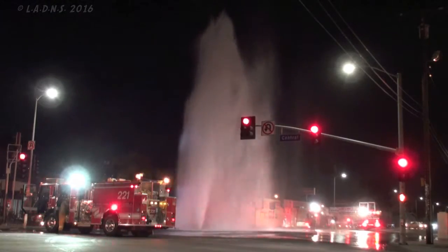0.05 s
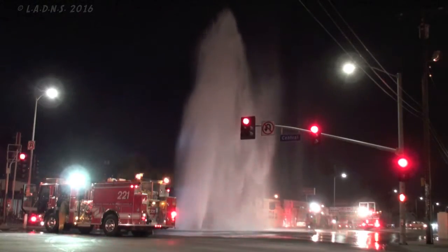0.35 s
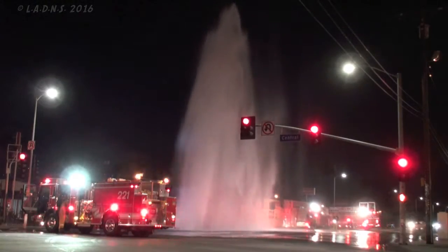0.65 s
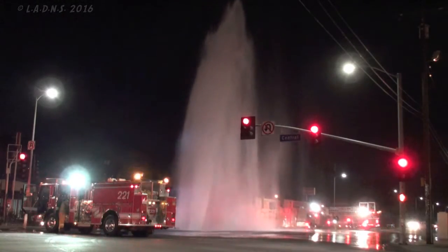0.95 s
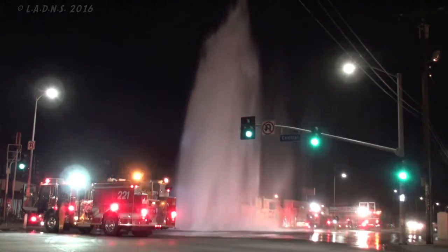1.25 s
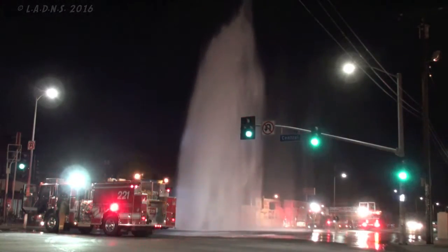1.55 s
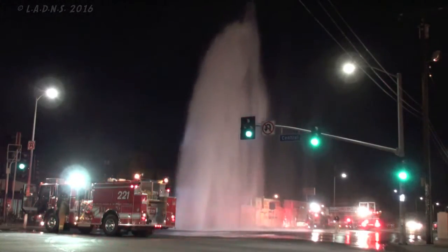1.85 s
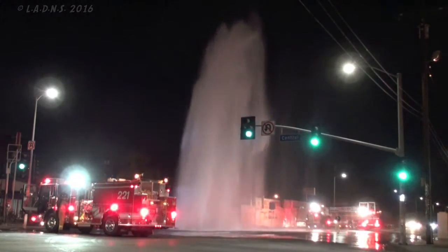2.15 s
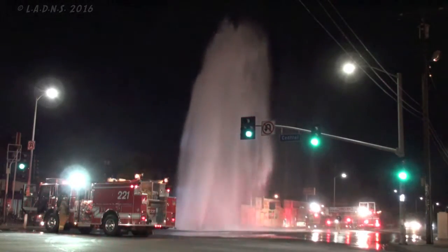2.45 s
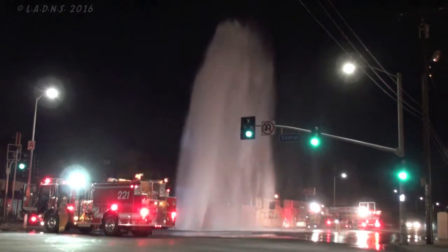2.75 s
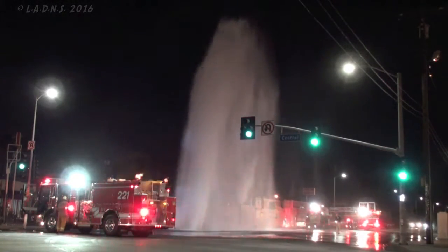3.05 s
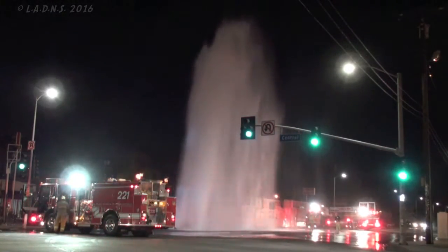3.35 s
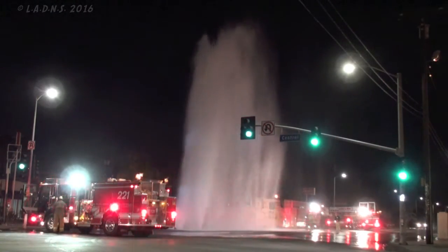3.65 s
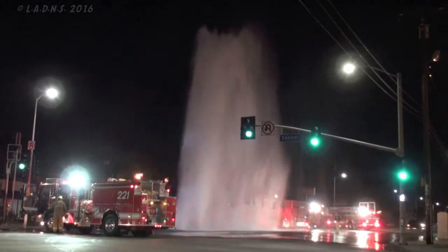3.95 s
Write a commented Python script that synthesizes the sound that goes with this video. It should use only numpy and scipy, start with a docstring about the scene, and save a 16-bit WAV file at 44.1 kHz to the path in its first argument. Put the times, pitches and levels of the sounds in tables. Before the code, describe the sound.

Water from a broken hydrant roars steadily and splatters on the street, with slapping clumps and ticking drops. Idling trucks rumble behind it, and halfway through an engine on the left pulls away, rising in pitch, heard in stereo.

```python
"""A broken hydrant throws a tall column of water that roars and splatters down on a night street.
At the stereo microphones its fall is a flickering roar, with sheets landing, clumps slapping the road
and drops ticking on the asphalt. Standing trucks rumble behind it. Halfway through, an eight-cylinder
engine on the left pulls away, its exhaust rising in pitch, and the recorder's gain control eases
everything down a little."""
import sys
import numpy as np
from scipy import signal
from scipy.fft import rfft, irfft
from scipy.io import wavfile

SR = 44100
rng = np.random.default_rng(int(sys.argv[2]) if len(sys.argv) > 2 else 0)


def wav_out(sig):
    """Save sig, one row per channel (or a flat mono array), as 16-bit PCM at SR to the path in sys.argv[1]."""
    wavfile.write(sys.argv[1], SR, np.round(np.clip(np.atleast_2d(sig).T, -1, 1) * 32767).astype(np.int16))


N = 176400
T = np.arange(N) / SR
HZ = np.maximum(np.fft.rfftfreq(N, 1 / SR), 1)


def from_db(db):
    """Decibels to gain."""
    return 10 ** (np.asarray(db) / 20)


def rms_one(x):
    """Scale to unit power."""
    return x / np.sqrt(np.mean(x ** 2) + 1e-20)


def in_time(rows):
    """Read a control curve at every sample."""
    return np.interp(T, *np.transpose(rows))


def at_hz(points, hz):
    """Read a spectrum on a log-frequency axis."""
    f, value = np.transpose(points)
    return np.interp(np.log(hz), np.log(f), value)


def pan(db):
    """Gains that make the left channel louder than the right by db."""
    return from_db(np.array([[.5], [-.5]]) * db)


def drift(rate_hz):
    """Smooth random motion of spread 1."""
    step, settle = 40, 2000
    r = np.exp(-2 * np.pi * rate_hz * step / SR)
    noise = rng.standard_normal(N // step + settle + 2)
    slow = signal.lfilter([1], [1, -2 * r, r * r], noise)[settle:]
    return np.interp(np.arange(N) / step, np.arange(len(slow)), rms_one(slow))


def bandpass(x, low_hz, high_hz):
    """Butterworth band-pass."""
    return signal.sosfilt(signal.butter(2, [low_hz, high_hz], "band", fs=SR, output="sos"), x + 1e-18)


def resonate(x, hz, width_hz):
    """One resonance with gain 1 at its peak."""
    r = np.exp(-np.pi * width_hz / SR)
    feedback = [1, -2 * r * np.cos(2 * np.pi * hz / SR), r * r]
    return signal.lfilter(np.array([1, 0, -1]) * (1 - r * r) / 2, feedback, x + 1e-18)


def resonate_twice(x, hz, width_hz):
    """Two equal resonances in series, for steeper sides."""
    return resonate(resonate(x, hz, width_hz), hz, width_hz)


def clicks(per_s, spread_db):
    """Random impacts, mostly small with a few large."""
    sizes = np.minimum(rng.exponential(1, N), 4)
    return (rng.random(N) < per_s / SR) * from_db(spread_db * sizes)


# How alike the left and right channels are; the highest treble is almost mono.
# Each row: frequency in Hz, likeness from 0 to 1.
STEREO_LIKENESS = [(40, 0), (110, .55), (250, .86), (430, .75), (750, .87), (1500, .58), (2200, .84),
                   (2650, .76), (3300, .91), (6500, .95), (9000, .92), (10500, .97), (11800, .996),
                   (14000, .999)]
# Which side is louder. Each row: frequency in Hz, left minus right in dB.
STEREO_BALANCE = [(60, -3), (110, 3.5), (260, 0), (450, 6), (720, 4.5), (1260, -1), (2380, 2.5),
                  (4400, 1.5), (8120, -0.5), (12000, 0.5)]


def stereo_noise():
    """White noise with the scene's stereo width and balance."""
    mid, side = rfft(rng.standard_normal((2, N)))
    alike = at_hz(STEREO_LIKENESS, HZ)
    pair = np.sqrt(1 + alike) * mid + np.sqrt(1 - alike) * side * [[1], [-1]]
    return irfft(pair * pan(at_hz(STEREO_BALANCE, HZ)), N)


def roar(colour_db, flicker_db, flicker_hz):
    """Coloured stereo noise in overlapping octaves that each flicker on their own."""
    coloured = rfft(stereo_noise()) * from_db(colour_db)
    out = 0
    for octave in range(4, 15):  # centres from 16 Hz to 16 kHz
        band = irfft(coloured * np.maximum(1 - abs(np.log2(HZ) - octave), 0), N)
        out = out + band * from_db(flicker_db * drift(flicker_hz))
    return rms_one(out)


# The trucks' rumble at the microphones. Each row: frequency in Hz, relative noise density in dB.
TRUCK_SPECTRUM = [(13, -41), (22, -7), (43, -7), (60, -11), (92, -5), (125, 0), (161, -0.5), (195, -1),
                  (262, -4.5), (303, -4.5), (333, -5.5), (372, -12.5), (400, -9.5), (520, -43), (880, -120)]


def trucks(level_db=-23.5, low_cut_hz=23):
    """Standing engines blur into one rumble in the background."""
    low_cut_db = -10 * np.log10(1 + (low_cut_hz / HZ) ** 10)
    colour_db = at_hz(TRUCK_SPECTRUM, HZ) + low_cut_db
    return from_db(level_db) * roar(colour_db, flicker_db=.6, flicker_hz=12)


# How strongly the exhaust passes a tone. Each row: frequency in Hz, gain in dB.
EXHAUST_RESPONSE = [(52, -28), (68, -14), (75, -6.5), (85, -4.5), (112, 1), (130, -4), (146, -7.5),
                    (160, -3.5), (175, -11.5), (186, -18.5), (204, -6.5), (218, -4.5), (232, -16),
                    (254, -16), (290, -23), (340, -16), (400, -44)]


def exhaust_tones(speed, turns, waver_db=.7, smear_rad=.55):
    """Harmonics of the crank glide through the exhaust's resonances."""
    tones = 0
    for k in range(2, 9):
        db = at_hz(EXHAUST_RESPONSE, k * speed) + waver_db * drift(rate_hz=10)
        # the muffler holds the low tones back longest, so each beat falls in pitch
        phase = 2 * np.pi * k * turns + smear_rad * k ** 2
        tones = tones + np.sqrt(2) * from_db(db) * np.cos(phase)
    return tones


# The exhaust pipe's resonances. Each row: centre in Hz, width in Hz, gain in dB.
PIPE_MODES = [(79.7, 24, 8), (116, 51, -3), (194, 45, 2.5)]


def burble(turns):
    """Four uneven firings a turn ring the pipe; gives a direct signal and one for stereo width."""
    fires = np.diff(np.floor(4 * turns), prepend=0)
    firings = fires * rng.standard_normal((2, N))
    return rms_one(sum(from_db(db) * resonate_twice(firings, hz, width) for hz, width, db in PIPE_MODES))


# The engine gathering speed. Each row: time in seconds, crank turns per second.
CRANK_SPEED = [(0, 22), (1.9, 24), (2.25, 28), (2.7, 36), (2.95, 37.5), (3.08, 36.6), (3.22, 39.7),
               (3.42, 41.7), (4, 44.2)]
# Its swell at the microphones. Each row: time in seconds, gain in dB.
ENGINE_GAIN = [(0, -54), (1.9, -34), (2.25, -27), (2.43, -20.5), (2.68, -23.5), (2.95, -18), (3.16, -20),
               (3.33, -16.5), (3.58, -18), (3.8, -15.5), (4, -15.5)]


def engine(jitter=.0015, puff_db=-19, right_lag_s=.00059, width=.91):
    """An eight-cylinder pulls away to the left with exhaust tones, burble and a puff of gas each turn."""
    speed = in_time(CRANK_SPEED) * (1 + jitter * drift(rate_hz=10))
    turns = np.cumsum(speed) / SR
    slow_fast_hz = [35.3, 44.2]
    burble_db = np.interp(speed, slow_fast_hz, [-6, -13])  # the firings even out with speed
    left_db = np.interp(speed, slow_fast_hz, [3, 10])  # it moves further left as it gathers speed
    tones = exhaust_tones(speed, turns)
    direct, side = burble(turns) * from_db(burble_db)
    gas = rng.standard_normal(N) * (1 + np.cos(2 * np.pi * turns))
    puffs = rms_one(bandpass(gas, low_hz=377, high_hz=790))
    left = tones + direct + from_db(puff_db) * puffs
    right = np.interp(T - right_lag_s, T, left)  # reaches the farther microphone later
    pair = np.array([left, right]) * pan(left_db)
    return from_db(in_time(ENGINE_GAIN)) * (pair + width * side * [[1], [-1]])


# Sheets of water on the street. Each row: peak time in seconds, half length in seconds, level in dB.
SHEETS = [(0.372, 0.093, -29), (.87, 0.16, -31), (1.367, 0.064, -28), (1.7, 0.049, -28), (2.2, .05, -31),
          (3.12, 0.3, -32.5)]


def sheets():
    """Sheets of water come down: a hollow roar that swells and fades."""
    hollow = rms_one(resonate_twice(stereo_noise(), hz=983, width_hz=260))
    return hollow * sum(from_db(db) * np.exp(-((T - peak) / half) ** 2) for peak, half, db in SHEETS)


# The clumps loudest at the microphones. Each row: start in seconds, level in dB, centre in Hz.
HEAVY_CLUMPS = [(.315, -30, 3500), (.347, -33, 2600), (.587, -35, 2900), (.82, -23.5, 2230),
                (1.203, -30, 2570), (1.258, -27.5, 1710), (1.425, -28.5, 2570), (2.02, -28, 2600),
                (2.37, -30.5, 3380), (2.62, -30, 2100), (2.992, -29.5, 2590), (3.225, -31, 2780),
                (3.567, -28, 2900)]


def splashes(rise_s=.007, width_hz=470):
    """Heavy clumps burst on the road: a quick swell of ringing noise that dies away."""
    out, noise = 0, stereo_noise()
    for start, db, hz in HEAVY_CLUMPS:
        age = np.maximum(T - start, 0) / rise_s
        ringing = rms_one(resonate(resonate(noise, hz, width_hz), hz, 2 * width_hz))
        out = out + from_db(db) * age * np.exp(1 - age) * ringing
    return out


def slaps(level_db=-37, decay_s=.013):
    """Small clumps slap the road: short bursts of noise in three bands."""
    edges_hz = np.geomspace(602, 3150, 4)
    decay = np.exp(-1 / (decay_s * SR))
    out, noise = 0, stereo_noise()
    for low, high in zip(edges_hz, edges_hz[1:]):
        bursts = signal.lfilter([1], [1, -decay], clicks(per_s=70, spread_db=1) + 1e-18)
        out = out + rms_one(bandpass(noise * bursts, low, high))
    return from_db(level_db) * rms_one(out)


def drops(level_db=-41):
    """Single drops tick on the asphalt, the same in both channels."""
    ticks = clicks(per_s=1800, spread_db=3.5) * rng.choice([-1, 1], N)
    return from_db(level_db) * rms_one(bandpass(ticks, low_hz=2480, high_hz=9000))


# The colour of the falling water. Each row: frequency in Hz, relative noise density in dB.
WATER_SPECTRUM = [(220, -41), (380, -26), (398, -3), (487, 0.2), (596, -1), (664, -3), (1030, -0.4),
                  (1310, -4), (1630, -6.5), (1770, -10), (2000, -5), (2640, -10.5), (2810, -12),
                  (3900, -13), (4340, -14), (4840, -15), (5230, -14), (7590, -17.5), (9000, -20),
                  (11900, -23), (15500, -39.5)]
# Narrow peaks and dips in that colour. Each row: centre in Hz, half width in Hz, gain in dB.
WATER_PEAKS = [(388, 43, -3.5), (630, 29, -1.5), (915, 21, 1.3), (1010, 15, 4.5), (1666, 37, 2),
               (1952, 12, 1.5), (2645, 26, 5.5), (3880, 97, -4), (4450, 140, 3), (4970, 87, -4.5),
               (5090, 110, 3), (5750, 110, 1.5), (6030, 110, -1), (6470, 160, 3.5), (7080, 140, -0.3),
               (7620, 230, 2), (8130, 130, -0.5), (8500, 190, 2), (9700, 250, 1), (11940, 330, 2.6),
               (13100, 400, 3.5)]
# The water's level as the column sways. Each row: time in seconds, gain in dB.
COLUMN_SWAY = [(0, -0.1), (.5, 0), (.85, 0.7), (1.3, 0.16), (1.7, 0), (2.5, 0.2), (3.3, -0.5), (4, -1.15)]


def water_column(roar_db=-22.5, waver_db=.08):
    """The hydrant's swaying column roars down on the street with slapping clumps and ticking drops."""
    peaks_db = sum(db * np.exp(-((HZ - hz) / width) ** 2) for hz, width, db in WATER_PEAKS)
    colour_db = at_hz(WATER_SPECTRUM, HZ) + peaks_db
    rush = from_db(roar_db) * roar(colour_db, flicker_db=.6, flicker_hz=46)
    fall = rush + slaps() + drops()
    return fall * from_db(in_time(COLUMN_SWAY) + waver_db * drift(rate_hz=2.8))


def scene():
    """The street at the microphones: water in front, trucks behind it, the engine off to the left."""
    return water_column() + splashes() + sheets() + trucks() + engine()


def record(dry, threshold_db=-16.5, cut_per_db=.24, response_s=.44, cutoff_hz=15700):
    """The recorder's slow gain control turns loud passages down, and the highest treble is cut."""
    r = np.exp(-1 / (response_s * SR))
    power = signal.lfilter([1 - r], [1, -r], np.mean(dry ** 2, axis=0))
    excess_db = np.maximum(10 * np.log10(power + 1e-12) - threshold_db, 0)
    held = dry * from_db(-cut_per_db * excess_db)
    return signal.sosfilt(signal.ellip(10, .1, 80, cutoff_hz, fs=SR, output="sos"), held)


dry = scene()
out = record(dry)
wav_out(out)
```